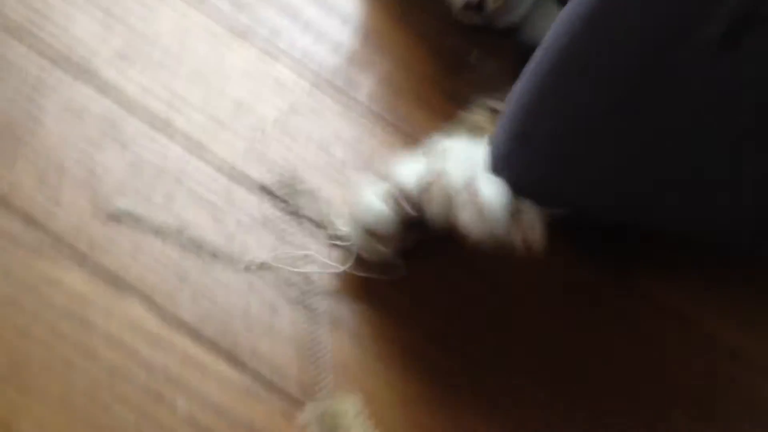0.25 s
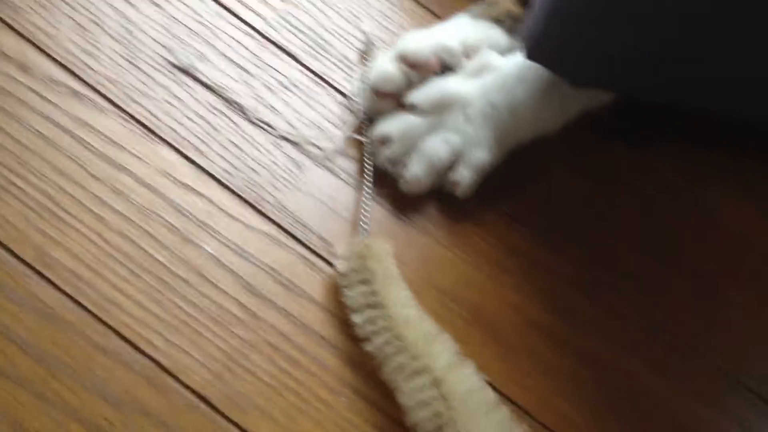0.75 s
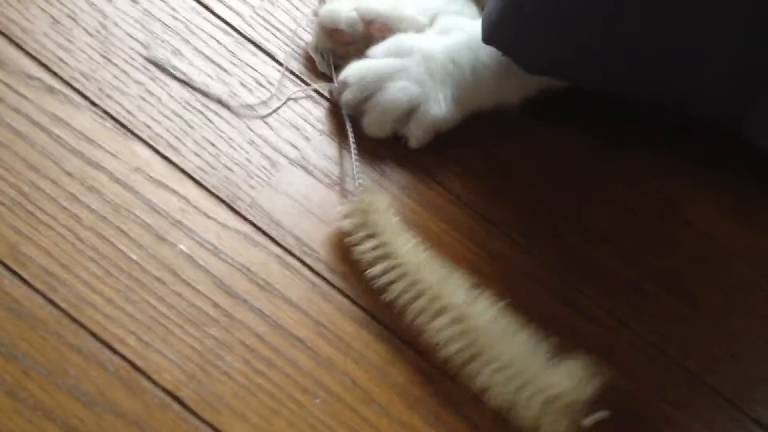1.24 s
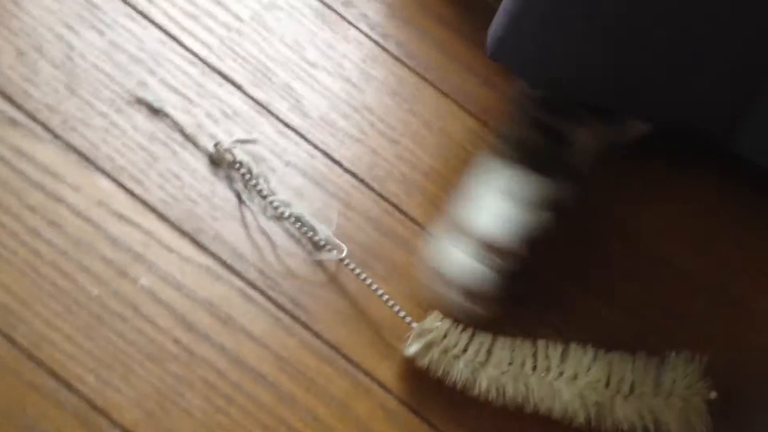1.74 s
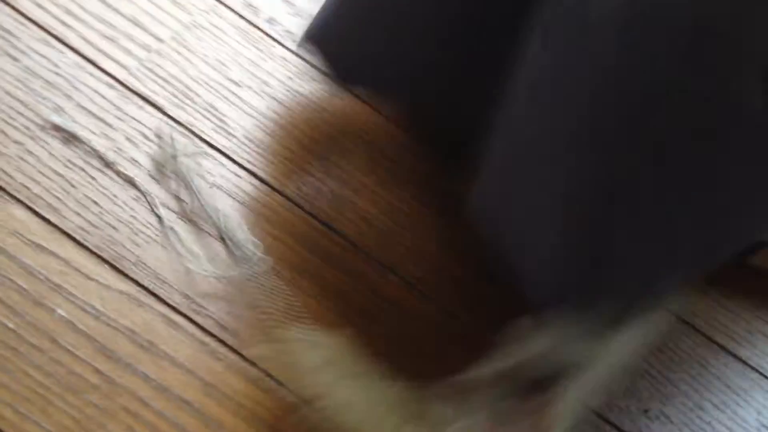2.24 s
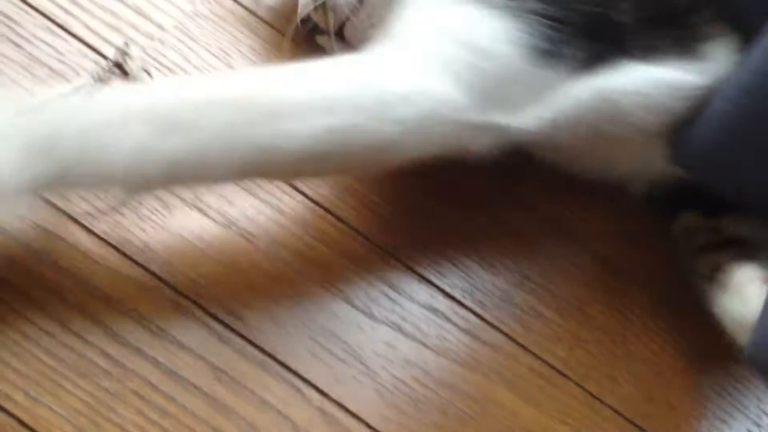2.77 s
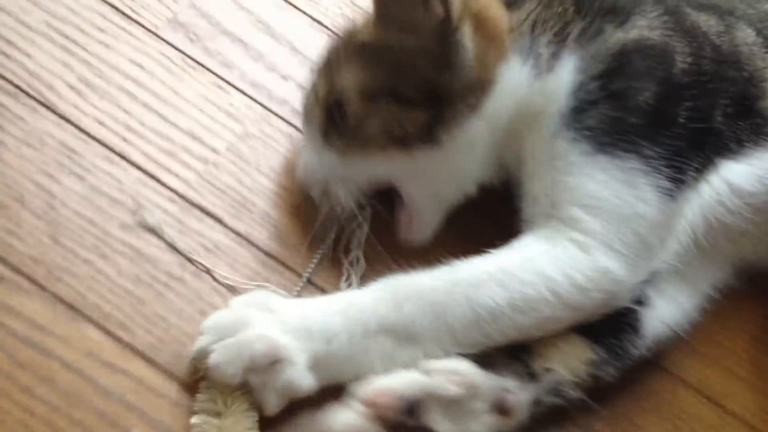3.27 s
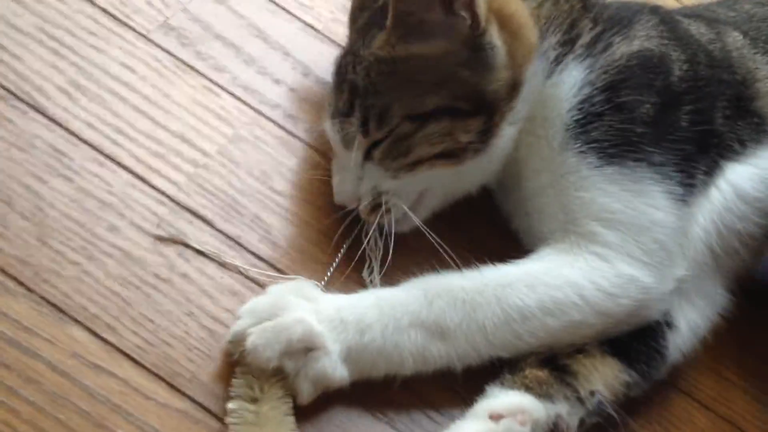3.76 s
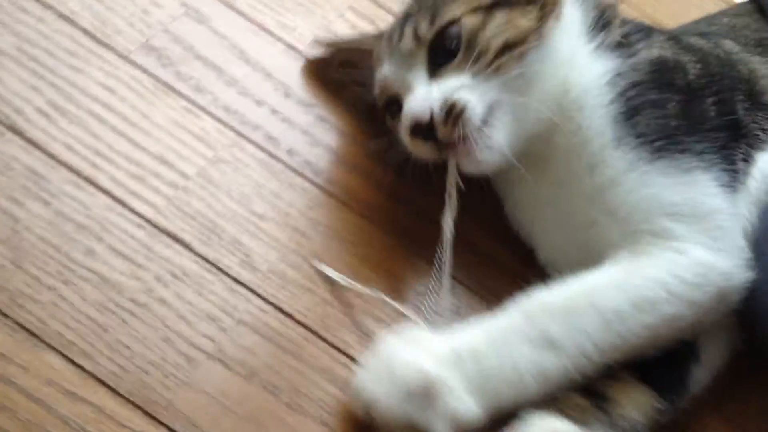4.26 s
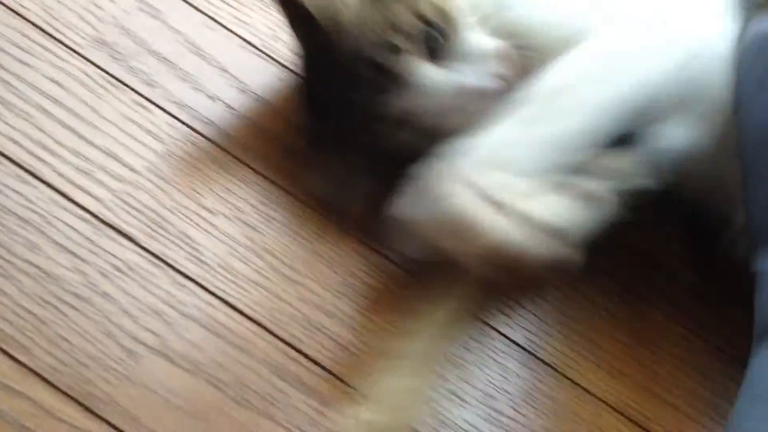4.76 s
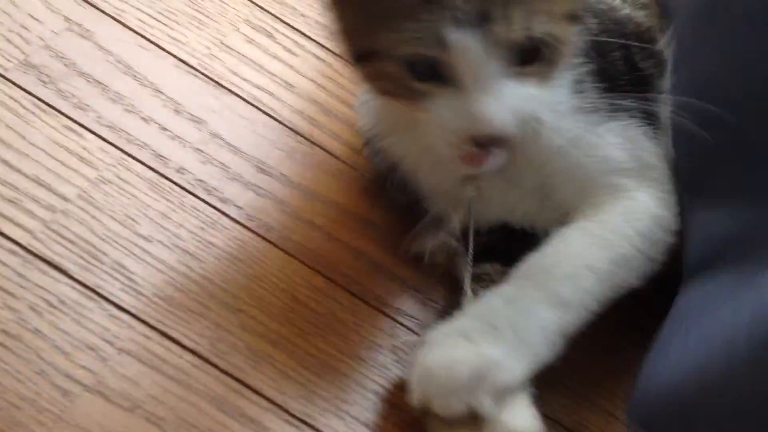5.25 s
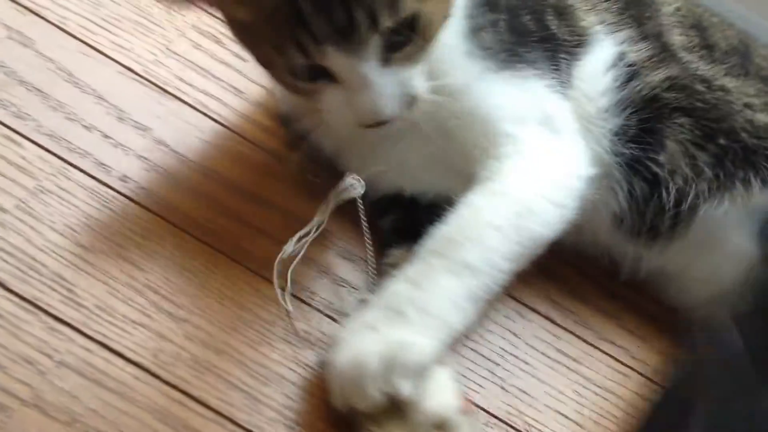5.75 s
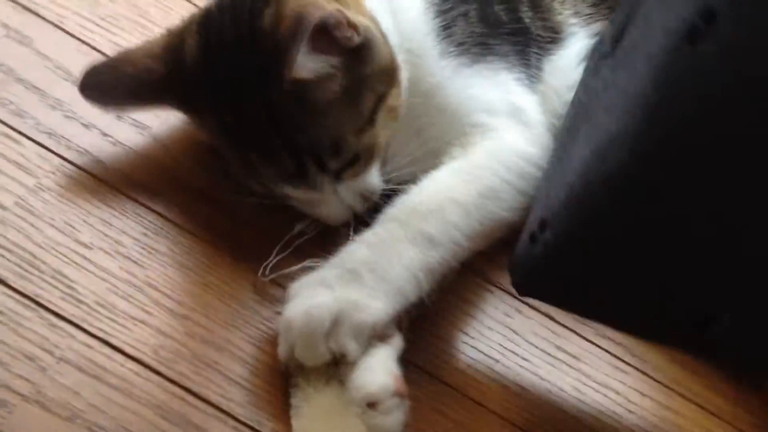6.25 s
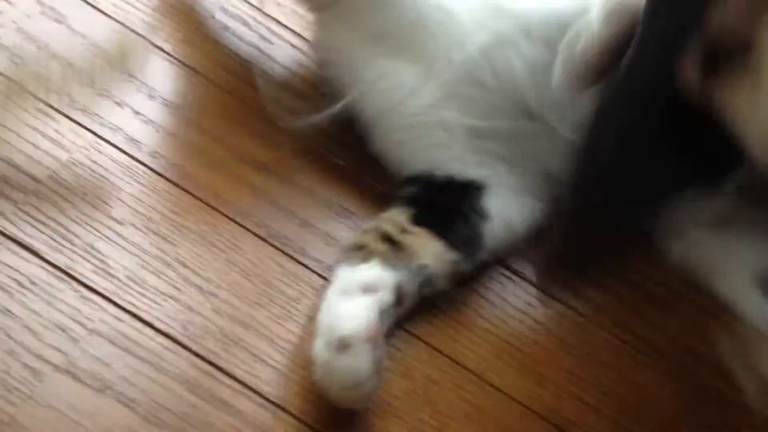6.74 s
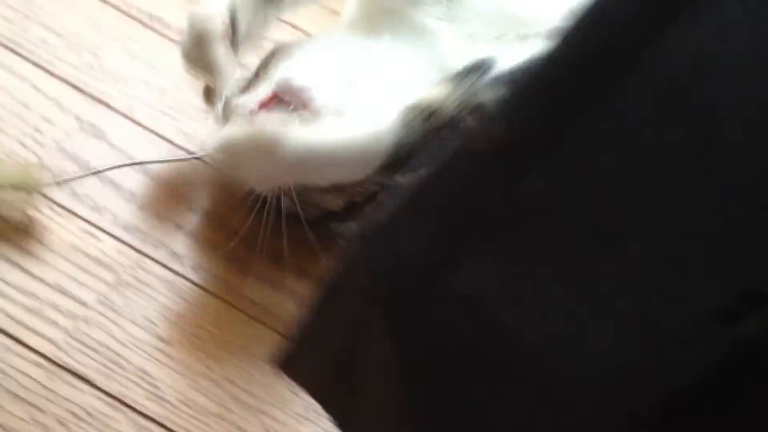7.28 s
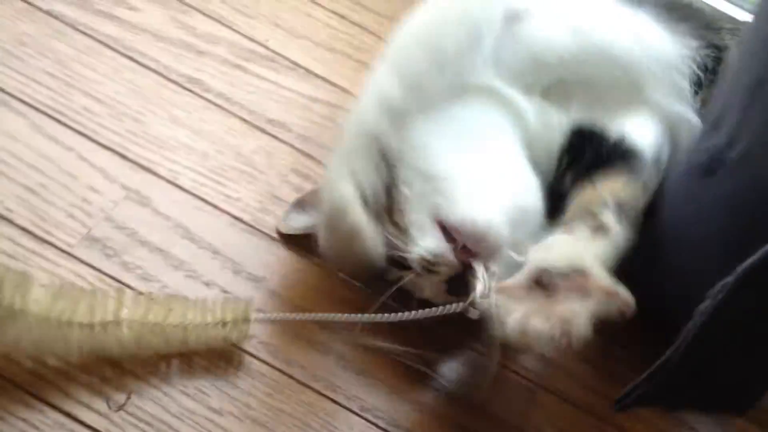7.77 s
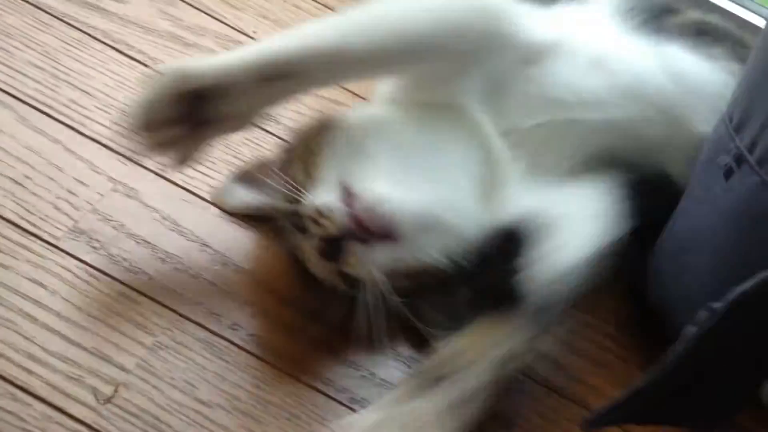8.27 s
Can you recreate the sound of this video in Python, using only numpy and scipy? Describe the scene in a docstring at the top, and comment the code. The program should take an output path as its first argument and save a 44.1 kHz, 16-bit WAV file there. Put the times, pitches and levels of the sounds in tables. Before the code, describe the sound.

A close microphone catches a kitten wrestling a wiry, fibrous toy on hollow floorboards. Small dry scratches lead to a strong low thud and clustered woody clicks. The middle is sparse, with soft scuffing, small ticks and faint crunchy nips. Then several dull thumps roll across the boards, and sharp claw knocks finish the tussle, with short room reverberation and low hiss.

```python
"""A kitten scuffles with a bristly toy on a twisted wire stem, on wooden floorboards, close by.
The toy, claws and fur are shaped noise with tiny catches; paw pads skid with an unsteady tone.
Claws and wire click as short noise bursts with a woody ring, and teeth nip with a crunch.
Paws and body thump the hollow floor as soft pushes that set the boards ringing.
A small room answers the play with a fading noise tail, over a faint steady hiss."""
import sys
import numpy as np
from scipy import signal
from scipy.fft import rfft, irfft, next_fast_len
from scipy.io import wavfile
from scipy.ndimage import uniform_filter1d, map_coordinates

SR = 44100
rng = np.random.default_rng(int(sys.argv[2]) if len(sys.argv) > 2 else 0)


def to_wav(s):
    """Save 16-bit WAV."""
    ch = np.atleast_2d(s).T  # columns
    pcm = np.round(np.clip(ch, -1, 1) * 32767)  # PCM
    wavfile.write(sys.argv[1], SR, pcm.astype(np.int16))


N = 375291


def amp(db):
    """Turn decibels into gain."""
    return 10 ** (np.asarray(db) / 20)


def unit(x):
    """Scale to an average strength (rms) of 1."""
    return x / np.sqrt(np.mean(x ** 2) + 1e-20)


def along(points, hz):
    """Read a curve of (f/Hz, value) points at any frequency, on a log axis."""
    f, value = np.transpose(points)
    return np.interp(np.log(hz + 1), np.log(f + 1), value)


def add(track, s, sound):
    """Mix a sound into the track at time s, in seconds."""
    part = track[round(s * SR):][:len(sound)]
    part += sound[:len(part)]


def level(strokes, attack_s, sag_db_per_s, release_t60):
    """Gain curve of (t/s, length/s, level/dB) strokes: each bites in, slowly loses pressure, then lets go."""
    power = np.zeros(N)
    for s, length, db in strokes:
        t = np.arange(int((length + release_t60) * SR)) / SR
        sag_db = sag_db_per_s * t
        release_db = 60 * np.maximum(t - length, 0) / release_t60
        attack = np.minimum(t / attack_s, 1)
        gain = attack * amp(db - (sag_db + release_db))
        add(power, s, gain ** 2)  # overlapping strokes add as power
    return np.sqrt(power)


def wobble(rate, size=N):
    """A smooth random curve through `rate` random points a second."""
    knots = rng.standard_normal(int(size * rate / SR) + 4)
    return map_coordinates(knots, [np.arange(size) * rate / SR])


def coloured(x, gain_db):
    """Filter x by a dB curve over frequency, without any sound before the event (minimum phase)."""
    half = next_fast_len(len(x) // 2 + 2048)
    hz = np.fft.rfftfreq(2 * half, 1 / SR)
    cepstrum = irfft(np.log(amp(gain_db(hz))))
    # folding the cepstrum onto positive time makes the filter causal
    cepstrum[1:half] *= 2
    cepstrum[half + 1:] = 0
    response = np.exp(rfft(cepstrum))
    return irfft(rfft(x, 2 * half) * response)[:len(x)]


def shaped(x, spectrum):
    """Filter x by a table of (f/Hz, level/dB), then bring it to rms 1."""
    return unit(coloured(x, lambda hz: along(spectrum, hz)))


def cut(x, hz, kind, order):
    """Butterworth low-pass or high-pass."""
    return signal.sosfilt(signal.butter(order, hz, kind, fs=SR, output="sos"), x)


def ring(modes, t, scatter_db):
    """Sum of dying sine tones (f/Hz, level/dB, t60/s), at new random strengths for each blow."""
    total = np.zeros(len(t))
    for hz, db, t60 in modes:
        strength_db = db + scatter_db * rng.normal()
        total += amp(strength_db - 60 * t / t60) * np.sin(2 * np.pi * hz * t)
    return total


def in_room(x, wet_db, build=0.0031):
    """Add a fresh, dulled noise tail that builds up fast and dies soonest in the highest treble."""
    # how long the room rings: f/Hz, t60/s
    room_decay = [(100, 0.38), (300, 0.3), (700, 0.37), (3000, 0.29), (8000, 0.33), (15000, 0.18)]
    hz, t, z = signal.stft(rng.standard_normal(SR // 2), SR, nperseg=256)
    decay = amp(-60 * t / along(room_decay, hz)[:, None])
    rise = 1 - np.exp(-t / build)
    tail = signal.istft(z * decay * rise, SR)[1]
    tail = cut(tail / np.linalg.norm(tail), 5100, "low", order=1)  # furnishings dull it
    return x + amp(wet_db) * signal.fftconvolve(x, tail)[:len(x)]


def slips(rate, spread_db, smooth):
    """Tiny stick-slip releases of uneven size, `rate` a second on average, plus a share of smooth friction."""
    spread = amp(spread_db * np.clip(rng.standard_normal(N), -2, 2))
    sizes = rng.standard_normal(N) * spread
    releases = sizes * (rng.random(N) < rate / SR)
    return unit(unit(releases) + smooth * rng.standard_normal(N))


def drifting(x, depth_db):
    """The colour flickers as the contact point moves over the boards."""
    z = signal.stft(x, nperseg=512)[2]
    field = rng.standard_normal(z.shape)
    field = uniform_filter1d(field, size=4, axis=0)  # smooth over frequency
    field = unit(uniform_filter1d(field, size=6, axis=1))  # and over time
    return signal.istft(z * amp(depth_db * field))[1][:len(x)]


def hiss():
    """Steady noise, the faint hiss of a quiet room."""
    # colour of the hiss: f/Hz, level/dB
    hiss_colour = [(30, -23), (80, -14.5), (130, 1), (200, -1.5), (280, -1), (400, -5.5), (650, -8),
                   (1000, -10.5), (2000, -12.5), (4000, -14), (6200, -12.5), (10000, -21.5), (13000, -15.5),
                   (15500, -17)]
    return amp(-68.5) * shaped(rng.standard_normal(N), hiss_colour)


def skids():
    """A pad sticks and slips at an unsteady rate for a moment: a judder when slow, a squeak when fast."""
    # paw pads skidding on the varnish: t/s, length/s, slip rate f/Hz, level/dB
    pad_skids = [(0.015, 0.094, 4040, -68), (4.314, 0.051, 296.6, -52)]
    track, t = np.zeros(N), np.arange(int(.2 * SR)) / SR
    for s, length, judder_hz, db in pad_skids:
        unsteadiness = 0.031 * np.cumsum(rng.standard_normal(len(t)))
        phase = 2 * np.pi * judder_hz * t + unsteadiness
        press = np.sin(np.pi * np.minimum(t / length, 1))
        tone = np.sin(phase) + 0.47 * np.sin(2 * phase) + 0.28 * np.sin(3 * phase)
        add(track, s, amp(db) * press * tone)
    return in_room(cut(track, 5500, "low", order=4), wet_db=-9)


def drags():
    """Bristles and twisted wire catch on the wood grain in quick spurts."""
    # the toy pulled over the grain: t/s, length/s, level/dB
    toy_pulls = [(0.26, 0.056, -48.5), (0.33, 0.023, -57), (0.378, 0.013, -53), (1.415, 0.031, -57),
                 (1.598, 0.1, -52.5)]
    # colour of bristles on wood: f/Hz, level/dB
    bristle_colour = [(350, -91), (600, -17), (777, -4), (855, -16.5), (1470, -1), (1660, -12),
                      (2220, -2.5), (2570, -10), (2870, -8.5), (4680, -7.5), (5510, -11), (6400, -8.5),
                      (7960, -11), (9630, -25), (15500, -30.5)]
    pull = level(toy_pulls, attack_s=0.0084, sag_db_per_s=31, release_t60=.24)
    spurts = amp(1.9 * np.clip(wobble(150), -2, 1))
    catches = slips(rate=2200, spread_db=-1.0, smooth=0.62) * spurts
    scrape = shaped(drifting(catches, depth_db=5), bristle_colour)
    return in_room(amp(-0.5) * pull * scrape, wet_db=-5)


def rakes():
    """Claws rasp along string and boards, catching many times a second."""
    # claws raking string and boards: t/s, length/s, level/dB
    claw_rakes = [(0.905, 0.063, -54.5), (0.94, 0.057, -51.5), (1.115, 0.05, -59), (1.215, 0.046, -56),
                  (1.33, 0.077, -57), (2.87, .15, -52), (3.06, 0.033, -49), (3.125, 0.13, -50),
                  (3.28, 0.12, -52.5), (4.405, 0.019, -52.5)]
    # colour of the rasping claws: f/Hz, level/dB
    claw_colour = [(350, -44.5), (600, -17), (788, -13), (866, -17.5), (1430, -5.5), (1690, -12.5),
                   (2220, -5), (2680, -9), (3520, -1.5), (4260, -10), (4940, -12), (7430, -17.5),
                   (9890, -25), (14300, -23.5), (15500, -32)]
    pressure = level(claw_rakes, attack_s=0.014, sag_db_per_s=13.5, release_t60=0.26)
    spurts = amp(2.1 * np.clip(wobble(110), -2, 1.5))
    catches = slips(rate=2500, spread_db=3.5, smooth=.7) * spurts
    rasp = shaped(drifting(catches, depth_db=1.5), claw_colour)
    return in_room(amp(-2) * pressure * rasp, wet_db=-9.0)


def slides(brush):
    """Fur and cloth brush the floor with a fine, soft grain."""
    # colour of fur and cloth: f/Hz, level/dB
    fur_colour = [(260, -41), (450, -15), (661, -0.5), (1090, -9), (1490, -4.5), (1760, -6.5), (2330, -7),
                  (4530, -8.5), (5580, -10.5), (13200, -14.5), (15500, -19)]
    fibres = slips(rate=3500, spread_db=4, smooth=0.98) * amp(1.6 * wobble(45))
    rustle = shaped(drifting(fibres, depth_db=2.5), fur_colour)
    return in_room(amp(-1.0) * brush * rustle, wet_db=-10)


def shifting(load):
    """Small shoves of the limbs keep the boards murmuring."""
    # colour of the murmuring boards: f/Hz, level/dB
    creep_colour = [(50, -35), (100, -11), (160, -1), (280, 0.5), (380, -6), (650, -10.5), (900, -29),
                    (1500, -51)]
    shoves = slips(rate=110, spread_db=2.5, smooth=0.61)
    murmur = shaped(in_room(shoves, wet_db=-5.5), creep_colour)
    return murmur * amp(0.5) * load


def stray_ticks(brush):
    """Claws graze the wood at random moments, as hard as the kitten moves."""
    ticks_per_s, tick_db, spread_db, treble_db = 14, 12, 2, -5
    draws = rng.random((round(ticks_per_s * N / SR), 2))
    hits = []
    for when, size in draws:
        hits.append((when * N / SR, tick_db + spread_db * (2 * size - 1), treble_db))
    return brush * clicks(hits)


def tussles():
    """Each twist or roll brushes the floor with fur, loads the boards and scatters claw ticks."""
    # the kitten twisting and rolling: t/s, length/s, fur level/dB, load on the boards level/dB
    rolls = [(0.935, 1, -72, -70), (1.928, 0.77, -60, -63), (2.917, 0.46, -68.5, -66),
             (3.65, 0.7, -69.5, -75.5), (4.208, 0.12, -62, -67), (4.359, .29, -55.5, -63),
             (4.767, 0.22, -60, -67.5), (5.17, .28, -66, -69), (5.43, 0.18, -61, -62),
             (5.648, 0.665, -73, -75), (6.497, 0.96, -65, -68), (6.805, 0.03, -62, -77),
             (7.01, 0.44, -74.5, -79), (7.61, 0.25, -60.5, -63), (8.09, .27, -66.5, -70)]
    shape = dict(attack_s=0.049, sag_db_per_s=0.5, release_t60=0.83)
    brush = level([(s, length, fur_db) for s, length, fur_db, _ in rolls], **shape)
    load = level([(s, length, load_db) for s, length, _, load_db in rolls], **shape)
    return slides(brush) + shifting(load) + stray_ticks(brush)


def struck_at(spot_hz):
    """The landing spot sits on the crest of one board mode and near the node of its octave."""
    # ringing tones of the floorboards: f/Hz, level/dB, t60/s
    board_modes = [(90.3, -24, 0.6), (122.6, -28, 0.18), (160.8, -19.5, 0.47), (202, -30, 0.13),
                   (276.2, -21.5, 0.62), (290, -19, 0.31), (326, -19, .3), (344.4, -20, .3),
                   (352, -29, .25), (500, -22, .25), (490, -19.5, 0.42), (594.6, -26.5, .28),
                   (740, -23.5, 0.31)]
    struck = []
    for hz, db, t60 in board_modes:
        crest = np.sin(np.pi / 2 * hz / spot_hz) ** 2  # 1 on the crest, 0 at the node
        struck.append((hz, db + 14 * (crest - 1), t60))
    return struck


def thumps():
    """A padded blow pushes the boards once, then they and the room ring on; soft blows stay dull."""
    # paws and body landing: t/s, level/dB, hardness level/dB, board pitch at that spot f/Hz
    landings = [(1.014, -45.5, -6.5, 293), (1.899, -45.5, -2.5, 274), (2.16, -8, -17, 288),
                (2.533, -39, -32, 153), (2.63, -31.5, -7.5, 269), (2.839, -44, -24, 132),
                (3.272, -37.5, -15, 269), (3.367, -40, -6.5, 269), (4.025, -47, -14.5, 194),
                (4.81, -35.5, -22, 254), (5.38, -49.5, -10, 270), (5.486, -48.5, -12, 272),
                (6.25, -53.5, -10, 158), (6.553, -49.5, -20, 133), (6.968, -31, 1, 490),
                (6.973, -20.5, -5, 160), (6.983, -21, -7.5, 164), (7.081, -14, -18.5, 203),
                (7.314, -46, -33, 151), (7.781, -42, -45, 157), (8.133, -40, -36, 204),
                (8.319, -18, -5.5, 332)]
    # colour of a padded push: f/Hz, level/dB
    pad_colour = [(30, -37), (55, -37), (80, -17.5), (120, -3.5), (170, 0.5), (270, 1.5), (400, -15.5),
                  (560, -18.5), (700, -32), (900, -56.5), (1400, -70.5), (4000, -100)]
    track, t = np.zeros(N), np.arange(int(.7 * SR)) / SR
    for s, db, hardness_db, spot_hz in landings:
        knock_db = 1.21 * (hardness_db + 19.0)  # a harder landing is shorter and reaches higher
        tilt = [(240, 0), (550, knock_db), (1000, 2.41 * knock_db)]
        push = coloured(signal.unit_impulse(len(t)), lambda hz: along(pad_colour, hz) + along(tilt, hz))
        push = push / np.abs(push).max()
        board_ring = ring(struck_at(spot_hz), t, scatter_db=2.5)
        boards = signal.fftconvolve(push, board_ring)[:len(t)] * amp(-39.5)
        add(track, s + 0.0015, amp(db - .5) * (in_room(push, wet_db=-6.0) + boards))
    return track


def clicks(hits):
    """A hard tip chatters for a few milliseconds, rings briefly and scuffs away."""
    # what rings under a click: f/Hz, level/dB, t60/s
    click_modes = [(1410, -22, 0.079), (1820, -26, .07), (1970, -24, 0.068), (2320, -23, 0.11),
                   (3235, -10, 0.046), (3920, -15.5, 0.044), (5000, -28, .04), (5700, -24.5, 0.03),
                   (7630, -2.5, 0.0148), (9030, -26, 0.024)]
    # colour of a click: f/Hz, level/dB
    click_colour = [(100, -12), (300, 4), (700, -0.5), (1100, 1.5), (3200, -0.5), (6000, 0.5), (9000, -6.5),
                    (12500, -10.5), (15500, -20)]
    chatter_t60_s, knock_db = 0.012, -8
    track, t = np.zeros(N), np.arange(int(.35 * SR)) / SR
    strike = amp(-60 * (t / chatter_t60_s) ** 1.03)
    for s, db, treble_db in hits:
        flutter_db = 6.5 * np.clip(wobble(400, size=len(t)), -2, 1.5)
        scuff = amp(-6.5 - 60 * t / 0.063 + flutter_db)
        wood = amp(-7) * ring(click_modes, t, scatter_db=1.5)
        contact = rng.standard_normal(len(t)) * (strike + scuff) + wood
        # the brighter the click, the lighter the touch and the thinner its woody mids
        mids_db = -9 - .5 * treble_db
        tilt = [(850, knock_db), (1500, mids_db), (3000, 0.015), (4500, 0.0044), (10000, treble_db + 11.0)]
        tick = coloured(contact, lambda hz: along(click_colour, hz) + along(tilt, hz))
        add(track, s, amp(db + 12.0) * in_room(tick / np.linalg.norm(tick), wet_db=-5.5))
    return track


def bites():
    """Each nip is a short crunch that rings the small mouth."""
    # teeth nipping the string: t/s, level/dB, mouth resonance f/Hz
    nips = [(3.727, -49, 2900), (3.833, -52.5, 2730), (5.21, -47, 2660), (5.23, -42.5, 2990),
            (6.248, -45.5, 2290)]
    track, t = np.zeros(N), np.arange(int(.25 * SR)) / SR
    for s, db, mouth_hz in nips:
        mouth = [(200, -20), (650, -6), (1500, -7), (mouth_hz * 0.98, -7), (mouth_hz, 0),
                 (mouth_hz * 1.18, -14), (14000, -22)]
        burst = rng.standard_normal(len(t)) * amp(-60 * t / 0.019)
        crunch = coloured(burst, lambda hz: along(mouth, hz))
        add(track, s, amp(db + 14.5) * in_room(crunch / np.linalg.norm(crunch), wet_db=-7.5))
    return track


def scene():
    """All the play over the steady hiss of a quiet room."""
    # claws and wire striking the wood: t/s, level/dB, treble level/dB
    wood_hits = [(1.4227, -37.5, -18), (1.4404, -38, -13), (2.2001, -44, -18), (2.2629, -37.5, -10),
                 (2.3693, -21.5, -15.5), (2.4058, -33.5, -14), (2.6225, -31.5, -16), (2.6309, -20.5, -18),
                 (2.693, -18, -8.5), (2.8313, -24.5, -10), (2.839, -21, -12), (2.8482, -19, -17.5),
                 (4.0247, -46.5, -4.5), (4.1502, -48, -5), (4.812, -26, -5.5), (5.009, -39.5, -1),
                 (5.5822, -41, -19.5), (6.756, -40.5, -9), (6.8712, -41.5, -4), (6.968, -33, -14),
                 (7.198, -35.5, -10), (7.213, -36, -8), (7.3158, -42.5, -5), (7.7735, -39.5, -20),
                 (7.8997, -41, -10), (8.016, -40.5, -7), (8.0824, -11, -2.5), (8.155, -23, -12.5),
                 (8.1827, -26.5, -10), (8.2192, -32.5, -17), (8.2804, -33, -17), (8.302, -30.5, -18.5)]
    rubbing = skids() + drags() + rakes() + tussles()
    contacts = thumps() + clicks(wood_hits) + bites()
    return (hiss() + rubbing + contacts)[None]


def record(dry):
    """The recorder weakens the deep bass and drops everything above its band limit."""
    top_hz = 15600
    size = next_fast_len(N + SR // 2)
    spectrum = rfft(cut(dry, 55, "high", order=2), size)
    kept = np.fft.rfftfreq(size, 1 / SR) < top_hz
    return irfft(spectrum * kept, size)[:, :N]


dry = scene()
out = record(dry)
to_wav(out)
```